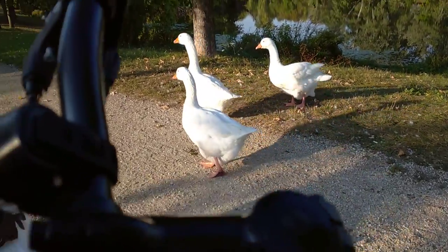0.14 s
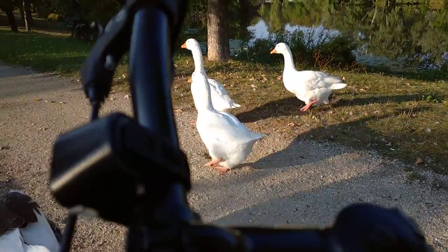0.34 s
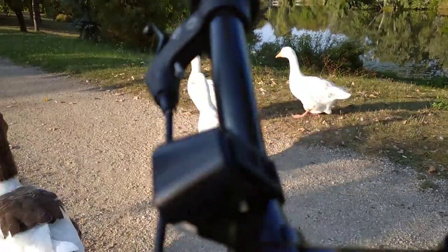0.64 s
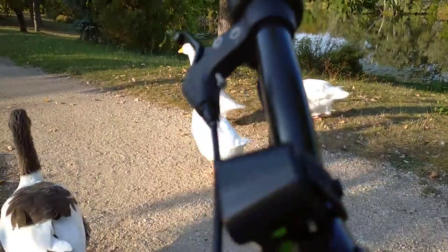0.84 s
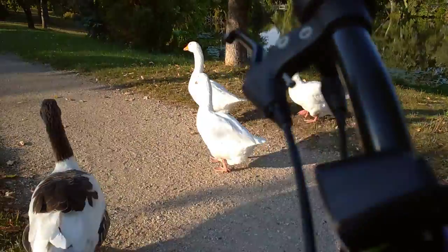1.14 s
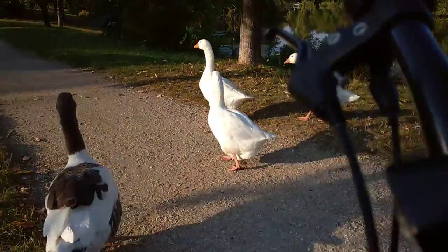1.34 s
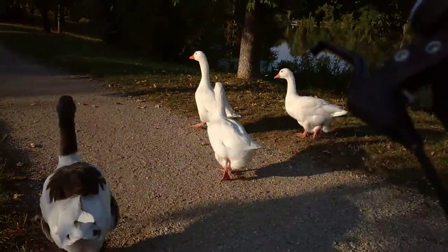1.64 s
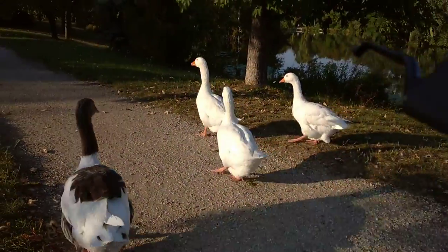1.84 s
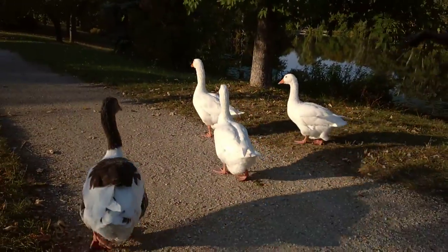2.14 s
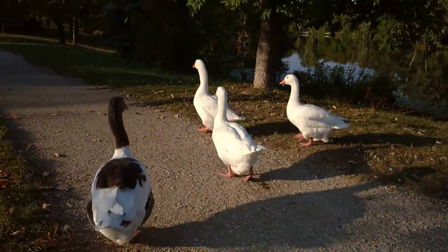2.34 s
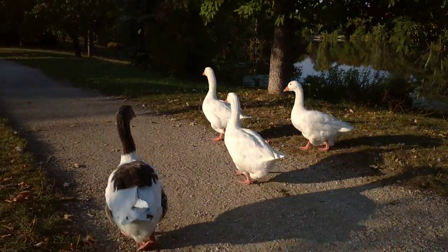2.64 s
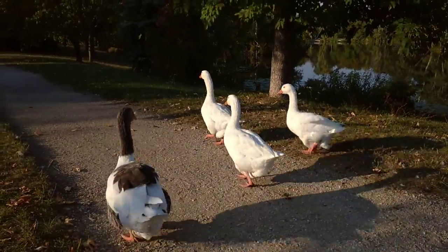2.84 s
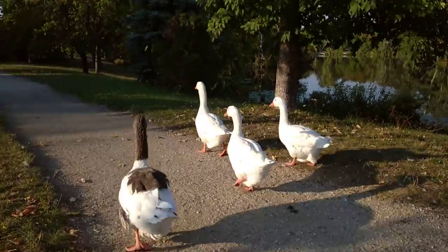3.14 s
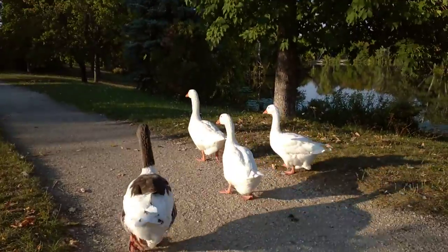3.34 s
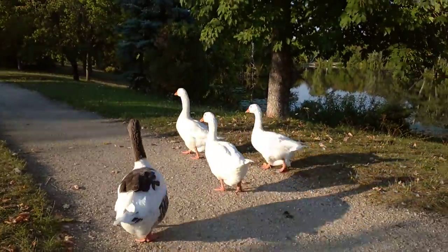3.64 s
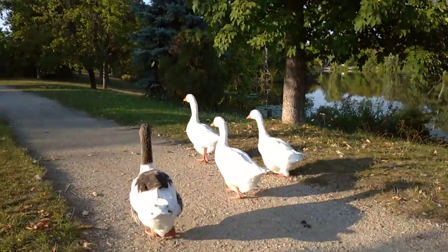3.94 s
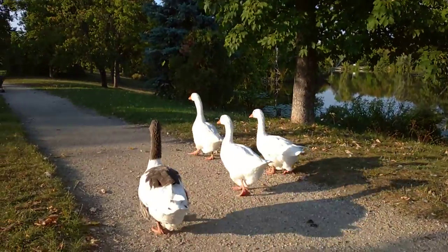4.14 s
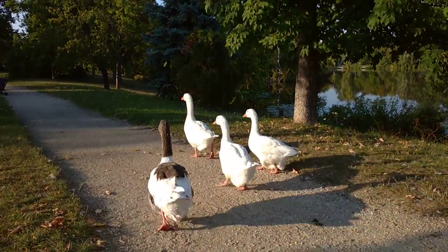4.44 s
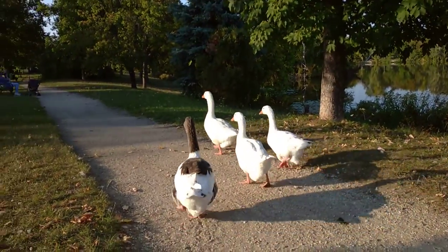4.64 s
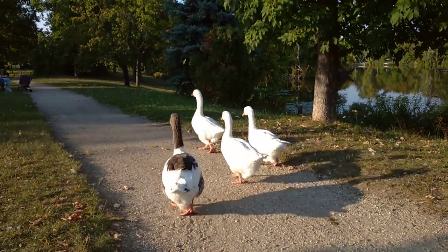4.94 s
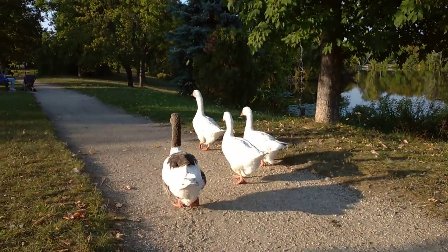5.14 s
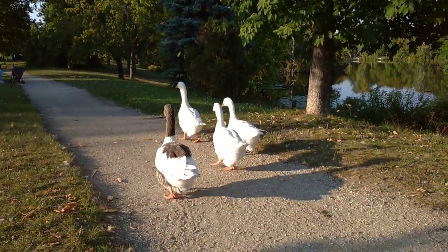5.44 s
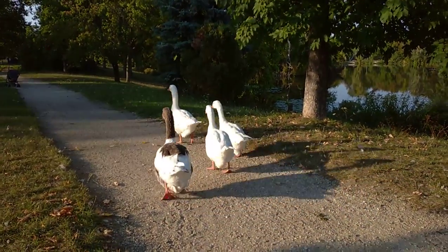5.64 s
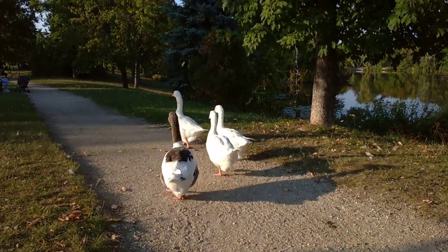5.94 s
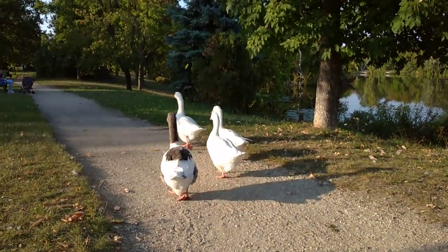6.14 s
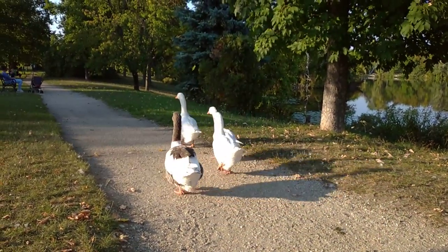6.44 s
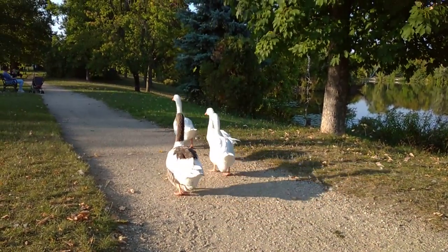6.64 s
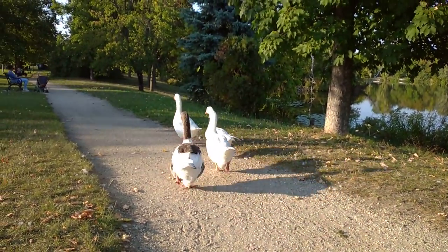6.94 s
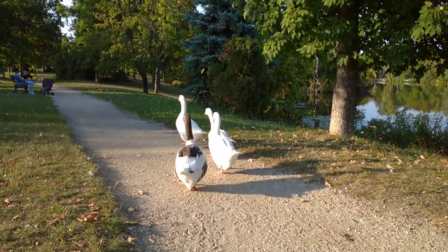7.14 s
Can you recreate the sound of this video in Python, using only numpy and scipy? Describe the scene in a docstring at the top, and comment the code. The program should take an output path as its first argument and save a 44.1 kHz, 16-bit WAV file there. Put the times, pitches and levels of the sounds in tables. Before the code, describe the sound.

Several domestic geese cackle a few steps ahead on a park path, trading short, raspy honks that often break into squeaks. The quick runs go on for nearly five seconds, pause for about a second, then one goose adds a last run. Close to the microphone, bicycle tyres and footsteps crunch softly on gravel, with small sharp ticks. Distant traffic rumbles on the left, where a faint engine gathers speed.

```python
"""Four domestic geese cackle in quick runs as they walk down a gravel park path, followed by a bicycle.
Each honk is a rattle of uneven pulses filtered by the throat, which may break into a short squeak
near 1 kHz when the membranes lock into fast vibration. Close by, gravel crunches in tiny impacts,
stones and bicycle parts tick, and a thin ping and a low bump sound once each.
Traffic rumbles throughout, and a far engine gathers speed."""
import sys
import numpy as np
from scipy import signal
from scipy.fft import rfft, irfft, next_fast_len
from scipy.io import wavfile
from scipy.ndimage import map_coordinates

SR = 44100
rng = np.random.default_rng(int(sys.argv[2]) if len(sys.argv) > 2 else 0)


def inscribe(sig):
    """Save sig as 16-bit PCM at rate SR to the path in sys.argv[1].

    A 1-D sig is mono; a 2-D sig holds one channel per row.
    Samples are clipped to [-1, 1] before scaling.
    """
    pcm = np.round(np.clip(np.atleast_2d(sig).T, -1, 1) * 32767)
    wavfile.write(sys.argv[1], SR, pcm.astype(np.int16))


N = 321048
T = np.arange(N) / SR

# Honks: bird, start_s, length_s, rattle_db, squeak_time_s, squeak_db, squeak_hz, chest_db
GOOSE_HONKS = [("shrill", -.01, 0.075, -36.5, .026, -32, 945, 13),
               ("shrill", .174, 0.053, -43.5, .194, -46, 917, 3.5),
               ("shrill", .333, 0.076, -38.5, .368, -32.5, 910, -5.5),
               ("shrill", .527, 0.043, -54.5, .544, -49, 902, 0),
               ("gruff", 0.6366, .06, -39.5, .705, -42.5, 955, -1),
               ("shrill", .7, .05, -40, .737, -34.5, 912, 4),
               ("gruff", 0.7963, .072, -34.5, .862, -59, 942, 4),
               ("shrill", .898, 0.052, -54, .92, -44, 887, -3),
               ("gruff", 0.95, 0.074, -33.5, 1.008, -31.5, 995, 9),
               ("shrill", 1.076, 0.029, -54, 1.092, -45.5, 867, -2),
               ("gruff", 1.114, .075, -36, 1.175, -34, 991, 10.5),
               ("gruff", 1.285, .088, -33, 1.327, -46, 958, -2.1),
               ("gruff", 1.462, .078, -34.5, 1.519, -32, 999, 3.3),
               ("shrill", 1.803, 0.053, -51.5, 1.815, -46.5, 887, -6),
               ("shrill", 1.959, 0.072, -49, 1.968, -45.5, 943, -9),
               ("shrill", 2.143, .087, -41, 2.182, -37.5, 917, 1),
               ("shrill", 2.317, 0.094, -52.5, 2.335, -44.5, 932, -2),
               ("shrill", 2.477, 0.094, -40, 2.515, -32, 948, -4),
               ("shrill", 2.702, 0.04, -49, 2.711, -48, 907, -5),
               ("hoarse", 2.738, 0.059, -35.5, 2.745, -51, 920, 0),
               ("hoarse", 2.889, .073, -41, 2.905, -45, 1002, 7),
               ("hoarse", 3.022, 0.086, -36.5, 3.073, -31.5, 1038, 6),
               ("hoarse", 3.185, .067, -39, 3.235, -60, 984, 0),
               ("hoarse", 3.326, 0.079, -37, 3.372, -39.5, 1005, 1),
               ("hoarse", 3.484, 0.076, -39.5, 3.529, -48, 965, 0),
               ("hoarse", 3.66, 0.091, -35.5, 3.717, -45.5, 982, -5.5),
               ("shrill", 3.797, .045, -52, 3.812, -47, 900, -1),
               ("shrill", 3.953, 0.078, -41.5, 3.989, -34.5, 936, 0),
               ("shrill", 4.122, .088, -54.5, 4.149, -50.5, 961, -0.95),
               ("shrill", 4.28, 0.087, -45, 4.327, -33, 957, -1),
               ("shrill", 4.473, 0.081, -55.5, 4.49, -46, 930, -6),
               ("shrill", 4.64, 0.073, -45, 4.685, -38.5, 930, -10.5),
               ("reedy", 5.639, .056, -41.5, 5.671, -40, 1028, -1),
               ("reedy", 5.798, 0.073, -44.5, 5.833, -46, 979, -6),
               ("reedy", 5.95, 0.073, -43, 6.001, -38, 1007, -2),
               ("reedy", 6.108, 0.073, -42.5, 6.157, -37.5, 1009, -2),
               ("reedy", 6.284, 0.051, -43, 6.309, -57, 1005, -3),
               ("reedy", 6.44, 0.084, -41, 6.496, -38.5, 1007, -1)]
# Throat resonances of each voice: frequency_hz, gain_db
GRUFF_FORMANTS = [(250, -53), (420, -33), (505, -3.5), (560, -18), (655, 3.5), (740, -5), (830, -8),
                  (1000, -1.5), (1120, -20.5), (1240, -16), (1500, -21.5), (2200, -58)]
HOARSE_FORMANTS = [(250, -55.5), (440, -35), (520, -7), (570, -13), (650, 2.5), (730, -4.5), (830, -12.5),
                   (1020, -3.5), (1120, -9), (1230, -17.5), (1450, -29), (2200, -66.5)]
SHRILL_FORMANTS = [(250, -32.5), (400, -27), (470, -1.5), (530, -11.5), (650, 3), (750, 4.5), (820, -1),
                   (940, 5.5), (1060, -8.5), (1300, -16.5), (2200, -57.5)]
CREAK_FORMANTS = [(250, -50), (480, -27), (600, -2), (670, 6), (780, -16.5), (980, 0), (1120, -9),
                  (1260, -4), (1600, -35), (1900, -10.5), (2500, -38), (2900, -21), (3500, -34),
                  (9000, -52)]
# Resonances that colour the rasp leaving the bill: frequency_hz, gain_db
GRUFF_BILL = [(700, -22.5), (1220, 3.5), (1480, 2), (1900, -2), (2270, -14), (2550, -4.5), (2790, -15),
              (3230, -2), (3800, -15), (4580, -13.5), (4900, -26), (6750, -16.5), (10000, -33),
              (15000, -64)]
HOARSE_BILL = [(700, -22), (1250, 4), (1680, -7), (2000, 5), (2330, -11), (2600, -7), (3200, -1),
               (3950, -10.5), (4250, -10), (4950, -15), (5550, -9.5), (6700, -22), (8600, -11),
               (13000, -51)]
SHRILL_BILL = [(700, -19), (1400, 0.5), (1680, 5.5), (2120, -1.5), (2300, -7.5), (2460, -1), (2680, -9),
               (3080, -3.5), (3550, -19.5), (3950, -2.5), (4500, -10), (6000, -25), (7600, -15),
               (13000, -61)]
# Rasp as the bills turn towards the listener and away: time_s, gain_db
BILL_FACING = [(0, 1.5), (1.2, -1), (1.9, 5.5), (2.5, 2), (2.75, -4), (3.1, 1), (4.3, -1), (5.7, 0)]
# Reverberation of the path and of the trees: frequency_hz, t60_s
PATH_DECAY = [(1500, 0.025), (8000, 0.042)]
TREE_DECAY = [(200, 0.17), (1000, 0.22), (3000, 0.46), (10000, 0.11)]
# Steady rolling on gravel: time_s, level_db
ROLLING = [(0.0, -74), (0.22, -74), (0.56, -63), (0.91, -69), (1.4, -72), (2.39, -69), (2.55, -74.5),
           (3.65, -64), (3.81, -68.5), (4.2, -62.5), (4.36, -67.5), (4.97, -74.5), (5.17, -70),
           (7.28, -74.5)]
# Scuffs in the gravel: centre_s, sigma_s, level_db
GRAVEL_SCUFFS = [(.02, 0.016, -56), (.255, 0.026, -55), (.41, 0.017, -54), (.56, .027, -56.5),
                 (1.36, .027, -59), (1.725, 0.031, -54), (1.82, 0.027, -54), (2.355, 0.023, -57.5),
                 (2.55, .047, -64), (2.88, .044, -58.5), (3.101, 0.027, -55.5), (3.23, 0.025, -56),
                 (3.57, 0.055, -52), (3.625, .02, -45), (4.33, .056, -57), (4.03, 0.053, -62),
                 (4.72, 0.04, -59), (4.9, .027, -59), (5.3, .029, -58), (5.42, .03, -61.5),
                 (5.92, .048, -59), (6.5, 0.037, -60), (6.74, .022, -67), (7.06, .038, -62)]
# The path turns sandy: time_s, sand_fraction
SAND_SHARE = [(4.3, 0), (5.3, 1)]
# Spectra of the grain impacts: frequency_hz, gain_db
CRUNCH_SPECTRUM = [(3000, -27), (5500, -23), (7400, -1), (8600, 4), (9900, -8), (12500, -7.5), (14500, -17)]
GRIT_SPECTRUM = [(1200, -11), (2200, -2), (3200, -3), (4400, 0), (5200, -8), (7000, -5), (12000, -38)]
SAND_SPECTRUM = [(2000, -21), (4200, 4.5), (6000, 4), (9000, -4), (12000, 1), (14500, -15)]
# Spectra of distant traffic: frequency_hz, gain_db
RUMBLE_SPECTRUM = [(15, -60), (25, -42), (39, -36), (52, -12), (70, -10.5), (90, -4), (130, -3), (170, -3),
                   (250, -5.5), (360, -16), (450, -21.5), (600, -46), (1000, -120)]
WASH_SPECTRUM = [(200, -20), (430, -4.5), (620, 1), (820, -3.5), (980, 3), (1180, -3), (1600, -3.5),
                 (2100, -8), (3000, -24.5), (6000, -29.5)]
# Slow creaks of a slack throat: start_s, length_s, level_db
THROAT_CREAKS = [(0.299, 0.056, -44), (2.193, 0.091, -43.5), (2.523, .09, -49), (3.7, 0.063, -44)]
# A thin ping and a low bump: start_s, pitch_hz, level_db, attack_s, t60_s
DAMPED_TONES = [(.358, 2100, -46, 0.0064, 0.24), (2.495, 165.5, -37, 0.011, 0.13)]
# Clicks of stones and bicycle parts: start_s, level_db, pitch_hz
CLICKS = [(0.597, -44, 8500), (1.6687, -39, 8900), (1.7857, -30, 7610), (1.8681, -42, 9080),
          (2.354, -36.5, 8720), (2.431, -42, 11600), (2.98, -48, 8490), (3.2517, -37.5, 8580),
          (3.3501, -30, 8350), (3.8722, -40, 8620), (3.9516, -40.5, 8700), (4.5304, -42.5, 4680),
          (5.357, -44, 8560), (5.4337, -41, 7570), (5.5951, -46, 3800), (5.7403, -40.5, 3800),
          (5.8945, -35.5, 3920), (5.9386, -42, 4710)]
# A far engine gathers speed and changes gear: time_s, firing_hz
ENGINE_FIRING = [(2.8, 54.1), (3.9, 64.47), (4.6, 72.47), (6.65, 102), (7.28, 89.1)]
# Exhaust resonances: frequency_hz, level_db
EXHAUST_RESPONSE = [(62, -84), (72, -74), (79, -62.5), (88, -60), (96, -65), (102, -59), (110, -71),
                    (129, -59), (145, -60), (180, -75)]


def amp(db):
    """Amplitude ratio of a level in decibels."""
    return 10 ** (np.asarray(db) / 20)


def unit(x):
    """Normalisation to rms 1."""
    return x / np.sqrt(np.mean(x ** 2) + 1e-20)


def match_energy(x, reference):
    """Scaling of x to the mean power of a reference."""
    return unit(x) * np.sqrt(np.mean(reference ** 2))


def along(points, hz):
    """Interpolation on a logarithmic frequency axis."""
    knots_hz, values = np.transpose(points)
    return np.interp(np.log(hz + 1), np.log(knots_hz + 1), values)


def curve(points):
    """Linear interpolation in time, one value per sample."""
    return np.interp(T, *np.transpose(points))


def wobble(knots_per_s, size=N):
    """Smooth random modulation: a spline through Gaussian values."""
    knots = rng.standard_normal(int(size * knots_per_s / SR) + 4)
    return map_coordinates(knots, [np.arange(size) * knots_per_s / SR])


def resonate(x, spectrum, scale=1, size=4096):
    """A minimum-phase resonator with this spectrum, its frequencies multiplied by scale."""
    gain = amp(along(spectrum, np.fft.rfftfreq(size, 1 / SR) / scale))
    cepstrum = irfft(np.log(gain))
    # folding the cepstrum makes the response causal
    cepstrum[1:size // 2] *= 2
    cepstrum[size // 2 + 1:] = 0
    return signal.fftconvolve(x, irfft(np.exp(rfft(cepstrum))))[:len(x)]


def noise(spectrum):
    """Spectral shaping of white noise, at rms 1."""
    size = next_fast_len(N)
    gain = amp(along(spectrum, np.fft.rfftfreq(size, 1 / SR)))
    return unit(irfft(rfft(rng.standard_normal(size)) * gain, size)[:N])


def pan(left_db):
    """Direction from the level difference between left and right."""
    return amp([[left_db / 2], [-left_db / 2]])


def scatter(x, decay):
    """Diffuse reflection: convolution with exponentially decaying noise, different on each side."""
    hz, t, bands = signal.stft(rng.standard_normal((2, SR // 2)), SR, nperseg=256)
    _, tail = signal.istft(bands * amp(-60 * t / along(decay, hz)[:, None]), SR, nperseg=256)
    return signal.fftconvolve(x[None], tail / np.linalg.norm(tail[0]), axes=1)[:, :N]


def breath(t, start, length, swell):
    """Driving pressure: one push of air rises for the fraction swell of its length, then falls."""
    ramp = np.interp((t - start) / length, [0, np.clip(swell, .05, .95), 1], [0, 1, 0])
    return np.sin(np.pi / 2 * ramp) ** 0.68


def call_span(start, length):
    """The samples of a call and its free decay."""
    return slice(max(0, int(start * SR)), min(N, int((start + length + .03) * SR)))


def slaps(size, rate_hz, jitter, spread_db):
    """A quasi-periodic pulse train: membranes slap shut at uneven intervals and strengths."""
    timing, strength = rng.standard_normal((64, 2)).T
    gaps = np.exp(jitter * timing)
    at = (np.cumsum(gaps) - gaps[0] + 0.199) * SR / rate_hz
    inside = at < size
    return np.bincount(at[inside].astype(int), amp(spread_db * strength[inside]), size)


def goose(bird, formants, easy_db, stretch_per_db, chest_hz, bill, rasp_db, swell, squeak_sigma_s,
          rate_hz, jitter, glide_hz_per_s, bend_hz_per_s2, waver, under_db, over_db, hiss, gain_db):
    """Source and filter: membrane pulses excite throat and bill, giving one bird's voice and rasp."""
    voice, rasp = np.zeros((2, N))
    honks = [row[1:] for row in GOOSE_HONKS if row[0] == bird]
    for start, length, rattle_db, squeak_at, squeak_db, squeak_hz, chest_db in honks:
        span = call_span(start, length)
        t = T[span]
        push = amp(rattle_db) * breath(t, start - .002, length, swell)
        pulses = slaps(len(t), rate_hz, jitter, spread_db=2)
        tract = [(hz, db + min(chest_db, 4) * np.exp(-((hz - chest_hz) / 45) ** 2))
                 for hz, db in formants]
        # effort beyond an easy honk reshapes the throat and shifts its resonances
        stretch = 1 + stretch_per_db * (max(rattle_db, squeak_db) - easy_db)
        rattle = match_energy(resonate(pulses * push, tract, stretch), push)
        # the membranes lock into a fast vibration whose second harmonic sits on a throat resonance
        reach = max(length, squeak_at - start) + .004
        lock = amp(squeak_db) * np.exp(-.5 * ((t - squeak_at) / squeak_sigma_s) ** 2)
        lock *= breath(t, start, reach, (squeak_at - start) / reach) ** .5
        offset_s = np.clip(t - squeak_at, -.035, .035)
        second_hz = squeak_hz + glide_hz_per_s * offset_s - bend_hz_per_s2 * offset_s ** 2
        fundamental_hz = second_hz * (1 + waver * wobble(350, len(t))) / 2
        phase = 2 * np.pi * np.cumsum(fundamental_hz) / SR
        upper = amp(over_db) * (np.sin(3 * phase) + 0.21 * np.sin(4 * phase))
        harmonics = amp(under_db + chest_db) * np.sin(phase) + np.sin(2 * phase) + upper
        squeak = np.sqrt(2) * lock * harmonics * amp(1.2 * wobble(256, len(t)))
        # while they are locked, the rattle gives way
        loose = 1 / np.sqrt(1 + 0.33 * (lock / amp(rattle_db)) ** 2)
        honk = loose * rattle + squeak
        voice[span] += honk
        # every closure also makes a sharp click and a puff of turbulent air
        closures = np.diff(np.floor(phase / (2 * np.pi)), prepend=0)
        clicks = unit(pulses) * push * loose + unit(closures) * lock
        airflow = signal.lfilter([1], [1, -np.exp(-1 / (0.0024 * SR))], clicks)
        puffs = airflow * rng.standard_normal(len(t))
        # the bill opens a little differently for every honk
        opening = [(hz, db + 1.6 * rng.standard_normal()) for hz, db in bill]
        excitation = unit(clicks) + hiss * loose * unit(puffs)
        buzz = resonate(excitation, opening, scale=1 + 0.011 * rng.standard_normal())
        rasp[span] += amp(rasp_db) * match_energy(buzz, honk)
    return amp(gain_db) * np.array([voice, rasp])


def flock():
    """Directivity and reflection: the rasp beams from the bills; the path and the trees scatter sound."""
    gruff = goose("gruff", GRUFF_FORMANTS, easy_db=-37.5, stretch_per_db=-.003, chest_hz=528,
                  bill=GRUFF_BILL, rasp_db=-15, swell=.52, squeak_sigma_s=.011,
                  rate_hz=152, jitter=.18, glide_hz_per_s=-1000, bend_hz_per_s2=29400,
                  waver=.014, under_db=-21, over_db=-30, hiss=1, gain_db=.5)
    hoarse = goose("hoarse", HOARSE_FORMANTS, easy_db=-33.5, stretch_per_db=.004, chest_hz=500,
                   bill=HOARSE_BILL, rasp_db=-15.5, swell=.5, squeak_sigma_s=.023,
                   rate_hz=180, jitter=.26, glide_hz_per_s=-500, bend_hz_per_s2=45000,
                   waver=.009, under_db=-18.5, over_db=-37, hiss=1.7, gain_db=0)
    shrill = goose("shrill", SHRILL_FORMANTS, easy_db=-40, stretch_per_db=.003, chest_hz=495,
                   bill=SHRILL_BILL, rasp_db=-13.5, swell=.23, squeak_sigma_s=.013,
                   rate_hz=240, jitter=.27, glide_hz_per_s=-2900, bend_hz_per_s2=65000,
                   waver=.014, under_db=-22, over_db=-23, hiss=.85, gain_db=0)
    reedy = goose("reedy", HOARSE_FORMANTS, easy_db=-47.5, stretch_per_db=0, chest_hz=493,
                  bill=GRUFF_BILL, rasp_db=-14, swell=.5, squeak_sigma_s=.012,
                  rate_hz=165, jitter=.22, glide_hz_per_s=-1000, bend_hz_per_s2=35000,
                  waver=.02, under_db=-20, over_db=-33, hiss=1.1, gain_db=.5)
    voice, rasp = gruff + hoarse + shrill + reedy
    voice += creaks()
    rasp *= amp(curve(BILL_FACING))
    off_path = amp(-1) * scatter(rasp, PATH_DECAY)
    off_trees = amp(-21.5) * scatter(voice, TREE_DECAY) + amp(-9) * scatter(rasp, TREE_DECAY)
    return pan(2.1) * voice + pan(-3.5) * (amp(-3.5) * rasp + off_path) + off_trees


def gravel():
    """Shot noise: tyres and shoes grind small stones in clumps of tiny cracks, swelling at each scuff."""
    roll_db, sand = curve(ROLLING), curve(SAND_SHARE)
    crunch_db = roll_db + 1.86
    grit_db = -66 + 0.65 * (roll_db - roll_db.mean()) + 3.5 * sand
    scuffs = sum(amp(db) * np.exp(-.5 * ((T - centre) / sigma) ** 2)
                 for centre, sigma, db in GRAVEL_SCUFFS)
    clumps = amp(2.5 * wobble(35) + 1.7 * wobble(220))

    def grains(spectrum, per_s, spread_db):
        """Impacts of random time and strength excite a common resonance."""
        strength_db = spread_db * np.minimum(rng.exponential(size=(2, N)), 5)
        strengths = amp(strength_db) * rng.standard_normal((2, N))
        impacts = clumps * strengths * (rng.random(N) < per_s / SR)
        return unit(np.array([resonate(side, spectrum) for side in impacts]))

    crunch = np.hypot(amp(crunch_db), amp(-2.5) * scuffs) * grains(CRUNCH_SPECTRUM, 7000, spread_db=3)
    grit = np.hypot(amp(grit_db), amp(-7.5) * scuffs) * grains(GRIT_SPECTRUM, 9000, spread_db=0)
    fizz = amp(-15 + 15.5 * sand) * scuffs * grains(SAND_SPECTRUM, 4000, spread_db=6.5)
    return pan(7.3) * crunch + pan(-2.8) * grit + pan(2) * fizz


def traffic(approach_db_per_s=.4):
    """Incoherent noise: a far rumble on the left slowly draws nearer under a diffuse wash."""
    rumble = pan(15.2) * noise(RUMBLE_SPECTRUM)
    rumble += amp(-23) * np.array([noise(RUMBLE_SPECTRUM), noise(RUMBLE_SPECTRUM)])
    wash = np.array([noise(WASH_SPECTRUM), noise(WASH_SPECTRUM)]) + 0.43 * noise(WASH_SPECTRUM)
    return amp(-61.5 + approach_db_per_s * T) * rumble + pan(1) * amp(-59 + .6 * wobble(1.44)) * wash


def creaks():
    """Pulse excitation: a slack throat beats so slowly that each slap is heard."""
    out = np.zeros(N)
    for start, length, db in THROAT_CREAKS:
        span = call_span(start, length)
        push = amp(db) * breath(T[span], start, length, swell=0.3)
        pulses = slaps(len(push), rate_hz=86, jitter=0.0585, spread_db=0.5)
        out[span] += match_energy(resonate(pulses * push, CREAK_FORMANTS), push)
    return out


def ping_and_bump():
    """Damped oscillation: single tones swell quickly and decay exponentially."""
    out = np.zeros(N)
    for start, hz, db, attack, t60 in DAMPED_TONES:
        t = np.maximum(T - start, 0)
        envelope = amp(db - 60 * t / t60) * (1 - np.exp(-t / attack))
        out += envelope * np.sin(2 * np.pi * hz * t)
    return pan(6.7) * out


def ticks(stray_count=10, snap_t60_s=0.006, splutter_t60_s=0.045):
    """Impact excitation: a snap and a brief splutter ring each stone or bicycle part at its own pitch."""
    # loose stones add fainter clicks at random moments
    stray_starts = rng.uniform(0, N / SR - .1, stray_count)
    strays = [(start, -49 + 3 * loud, 8300 * 1.1 ** high)
              for start, (loud, high) in zip(stray_starts, rng.standard_normal((stray_count, 2)))]
    out = np.zeros((2, N))
    t = np.arange(SR // 25) / SR
    fade = amp(-60 * t / snap_t60_s) + amp(-16 - 60 * t / splutter_t60_s)
    for start, db, hz in list(CLICKS) + strays:
        # a low knock lies beneath the resonance peak
        spectrum = [(400, -35), (1500, -20), (0.91 * hz, -9), (hz, 0), (1.23 * hz, -12), (3.8 * hz, -22)]
        click = np.array([resonate(fade * rng.standard_normal(len(t)), spectrum) for _ in range(2)])
        out[:, round(start * SR):][:, :len(t)] += amp(db - 20.5) * unit(click)
    return pan(4.7) * out


def engine(fade_in_s=.8):
    """Forced resonance: the two lowest orders of a far engine boom as they cross the exhaust's peaks."""
    firing_hz = curve(ENGINE_FIRING)
    phase = 2 * np.pi * np.cumsum(firing_hz * (1 + 0.0057 * wobble(12))) / SR
    drone = sum(amp(along(EXHAUST_RESPONSE, order * firing_hz)) * np.sin(order * phase)
                for order in (1, 2))
    fade_in = np.clip((T - ENGINE_FIRING[0][0]) / fade_in_s, 0, 1)
    return pan(14.5) * amp(-1.5 + 2 * wobble(7)) * fade_in * drone


def scene():
    """Superposition: geese ahead, gravel underfoot, traffic far off."""
    return flock() + gravel() + ticks() + ping_and_bump() + traffic() + engine()


def record(dry):
    """Band limiting: an ideal low-pass filter removes the highest treble."""
    cutoff_hz = 14650
    size = next_fast_len(N + SR // 2)
    passband = np.fft.rfftfreq(size, 1 / SR) < cutoff_hz
    return irfft(rfft(dry, size) * passband, size)[:, :N]


dry = scene()
out = record(dry)
inscribe(out)
```